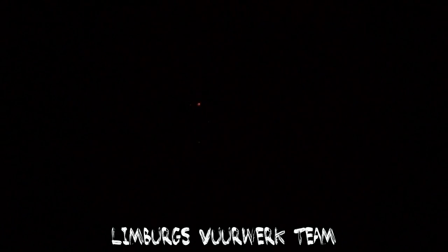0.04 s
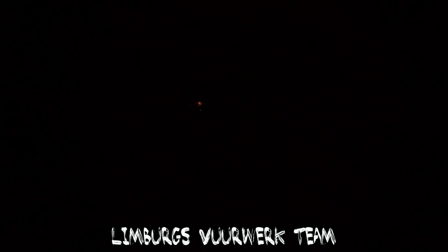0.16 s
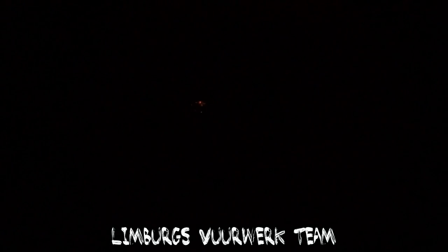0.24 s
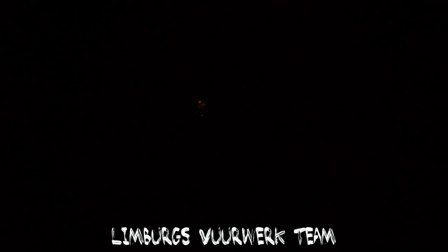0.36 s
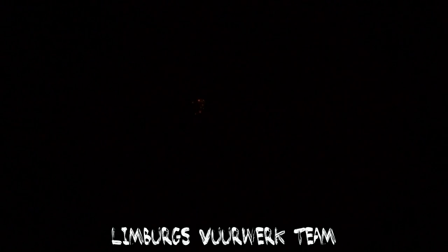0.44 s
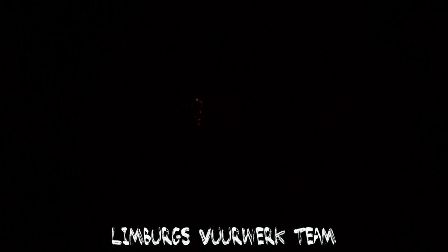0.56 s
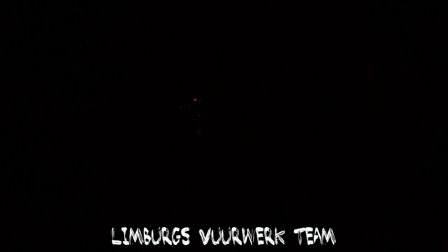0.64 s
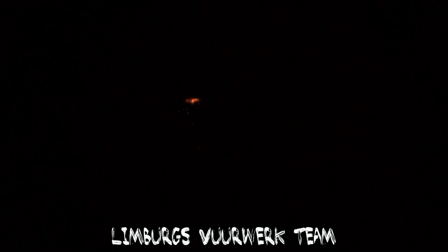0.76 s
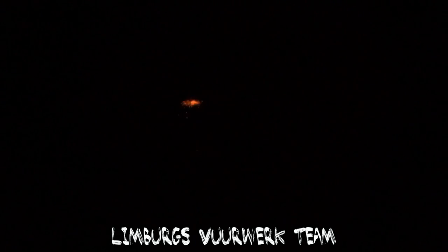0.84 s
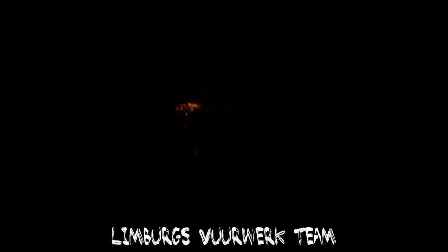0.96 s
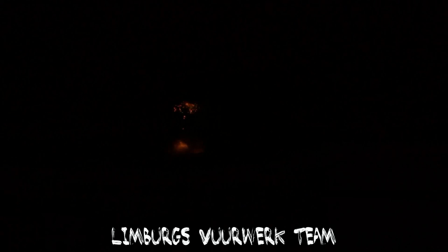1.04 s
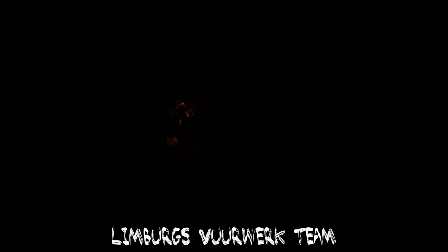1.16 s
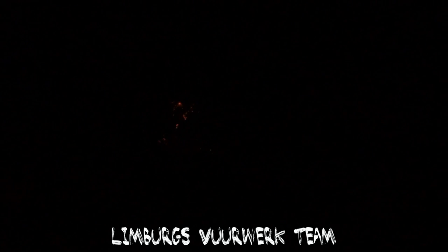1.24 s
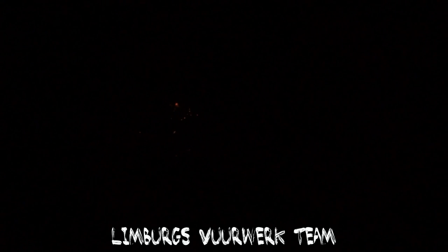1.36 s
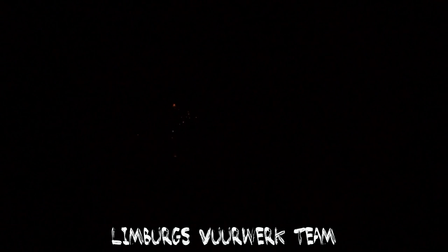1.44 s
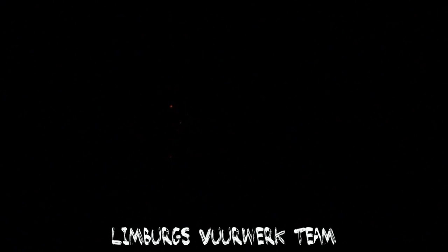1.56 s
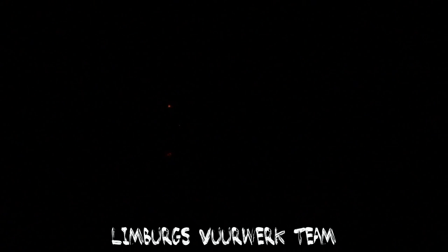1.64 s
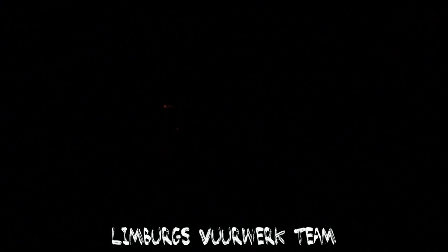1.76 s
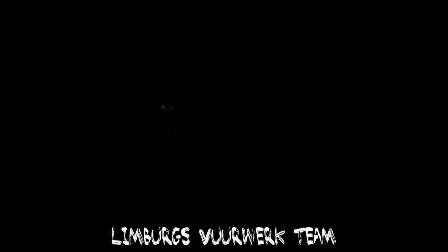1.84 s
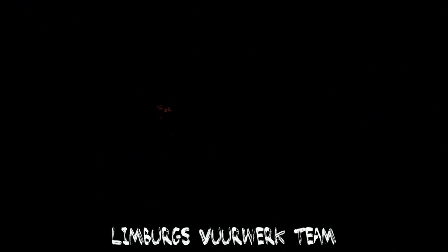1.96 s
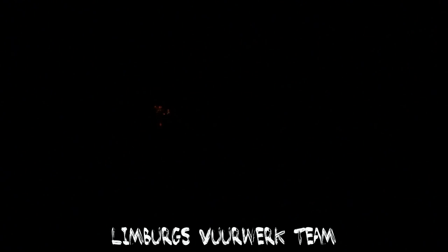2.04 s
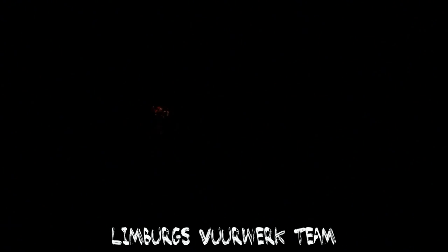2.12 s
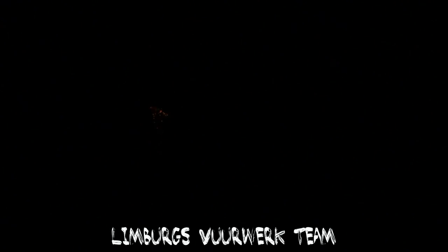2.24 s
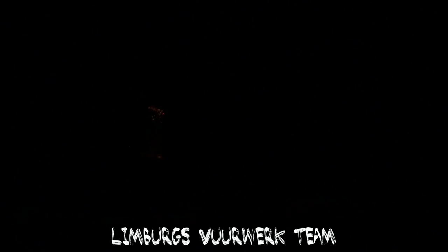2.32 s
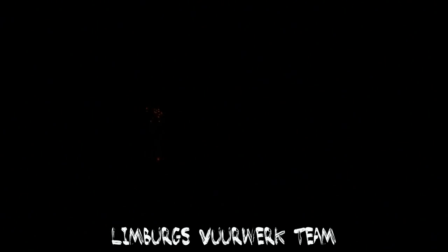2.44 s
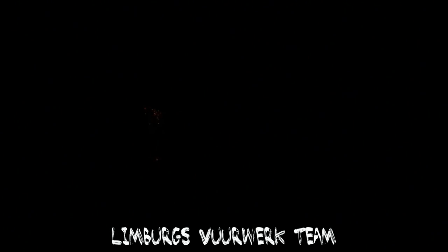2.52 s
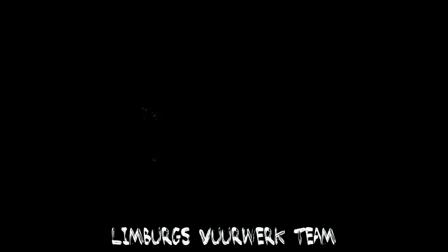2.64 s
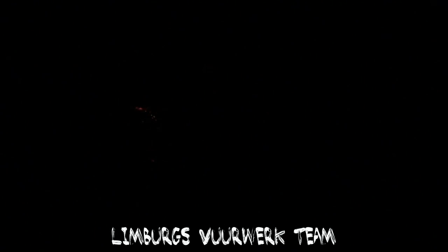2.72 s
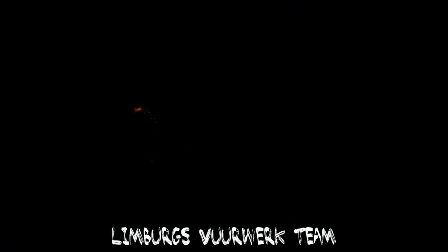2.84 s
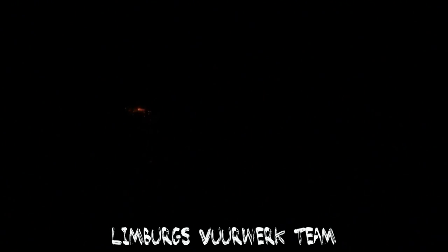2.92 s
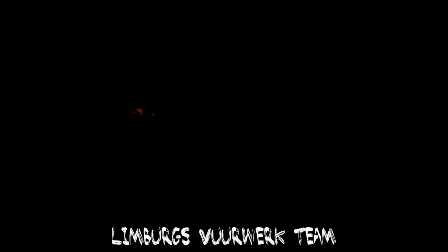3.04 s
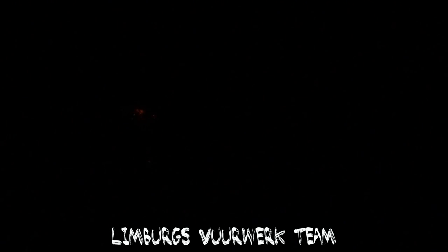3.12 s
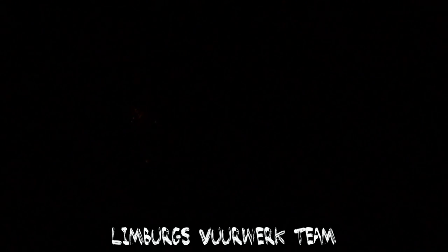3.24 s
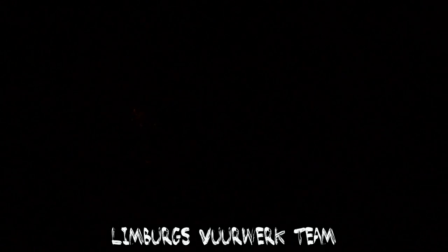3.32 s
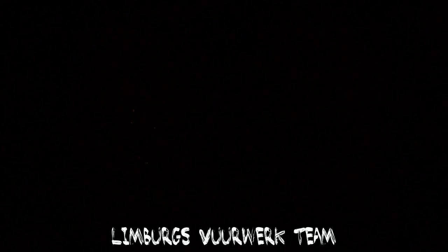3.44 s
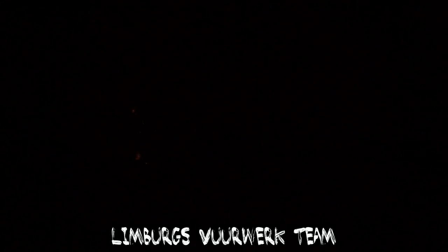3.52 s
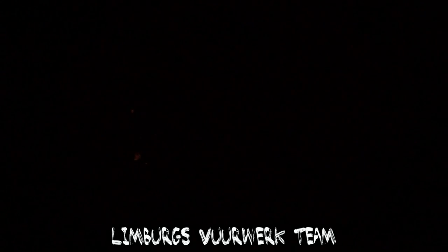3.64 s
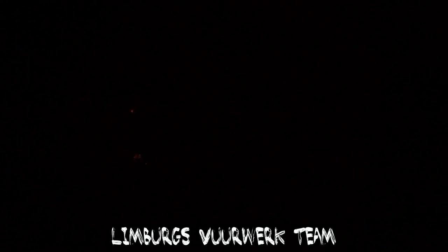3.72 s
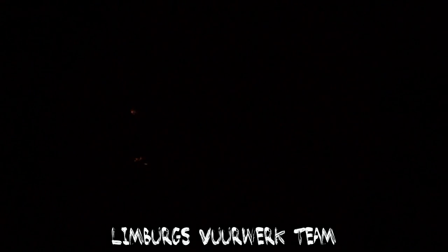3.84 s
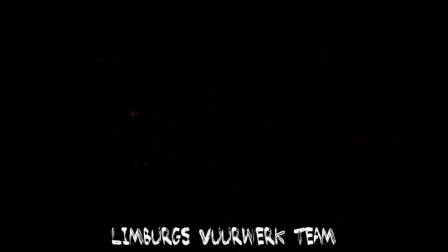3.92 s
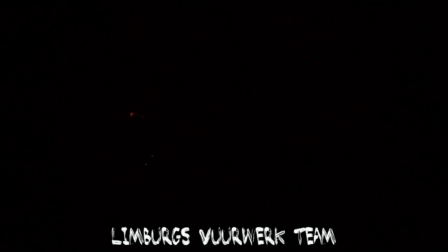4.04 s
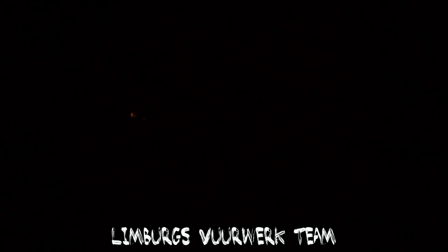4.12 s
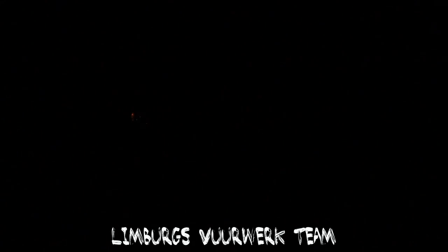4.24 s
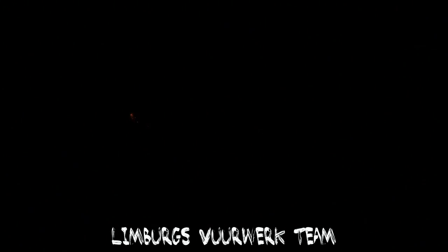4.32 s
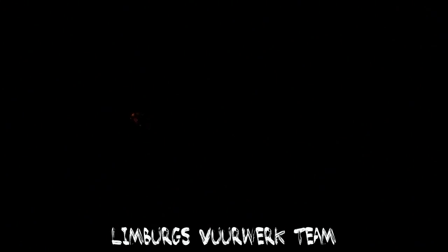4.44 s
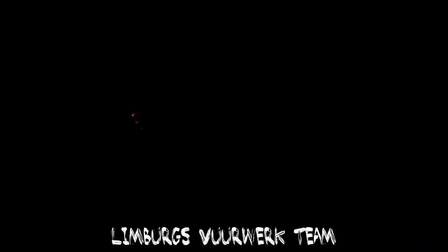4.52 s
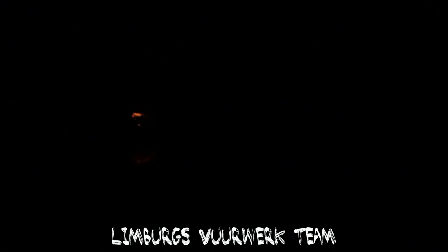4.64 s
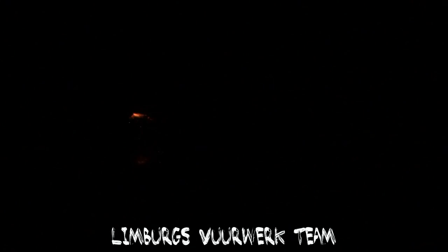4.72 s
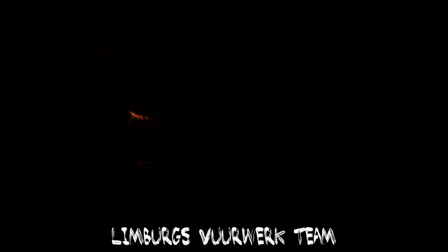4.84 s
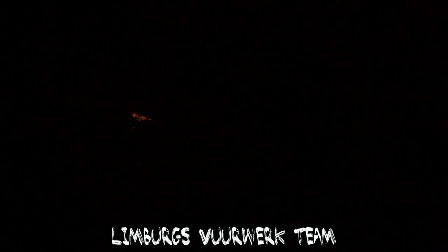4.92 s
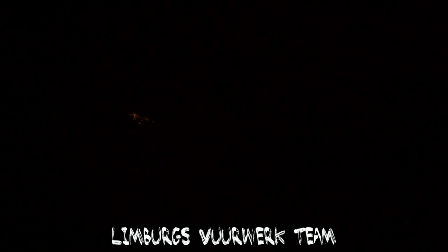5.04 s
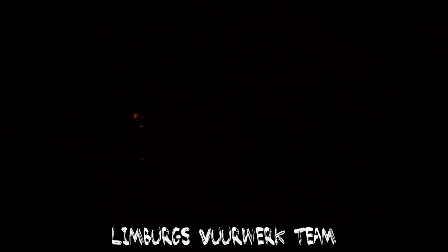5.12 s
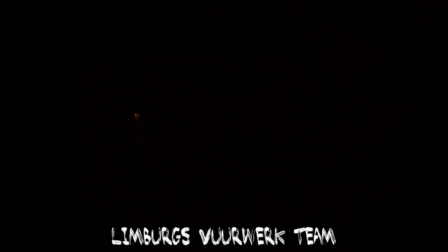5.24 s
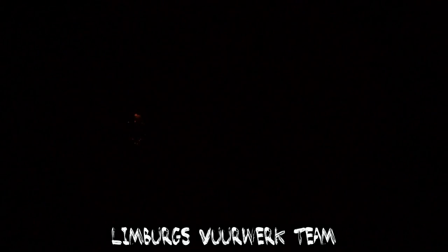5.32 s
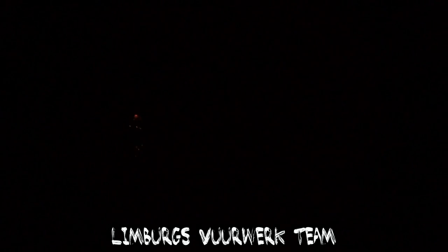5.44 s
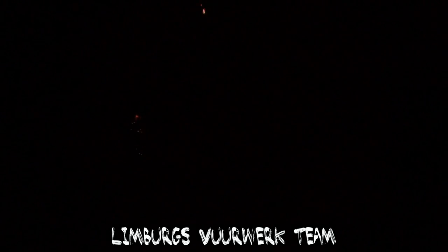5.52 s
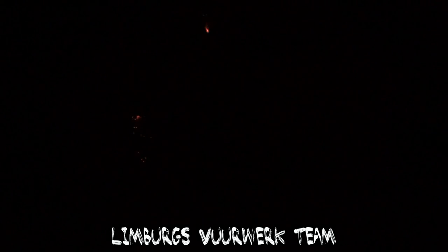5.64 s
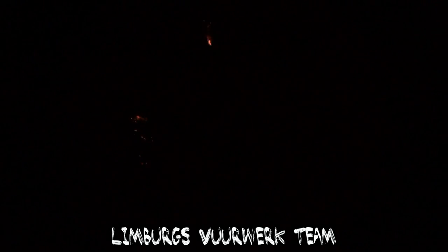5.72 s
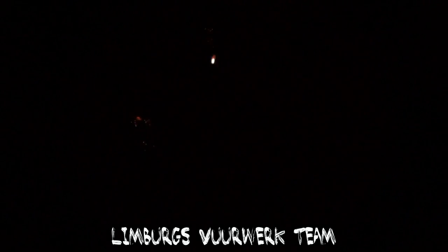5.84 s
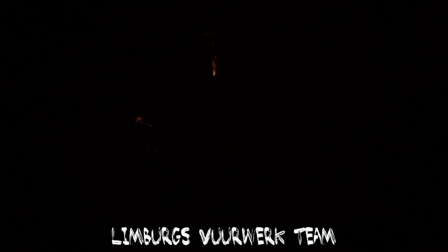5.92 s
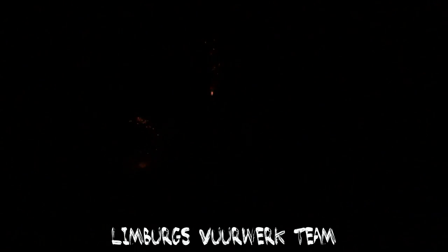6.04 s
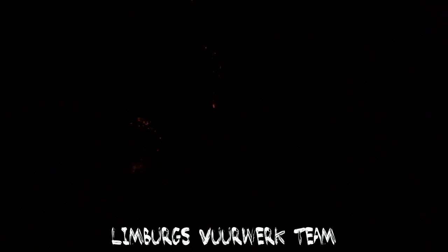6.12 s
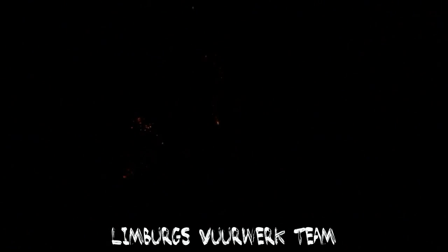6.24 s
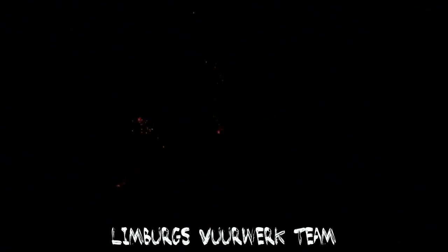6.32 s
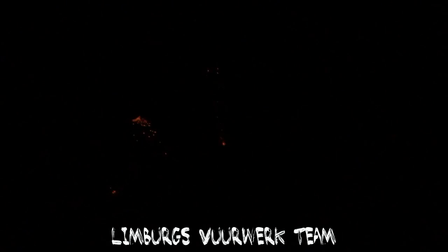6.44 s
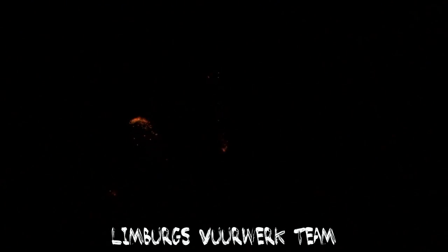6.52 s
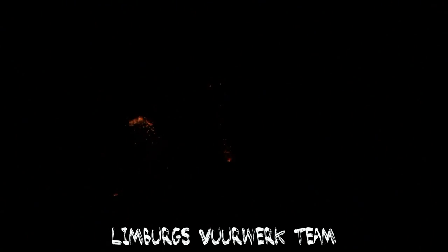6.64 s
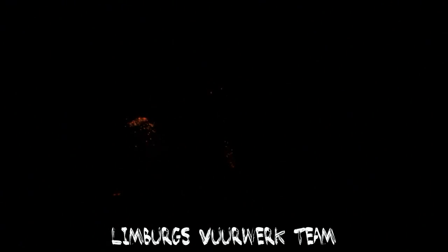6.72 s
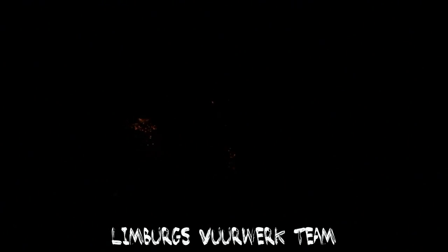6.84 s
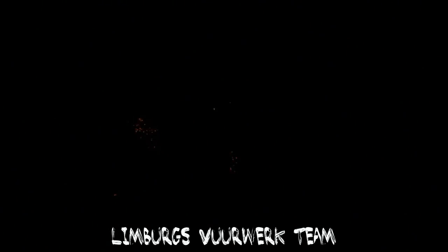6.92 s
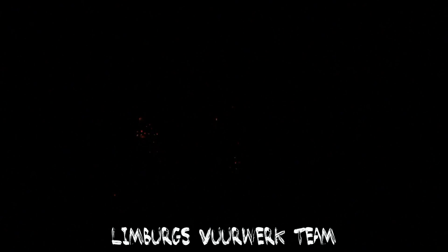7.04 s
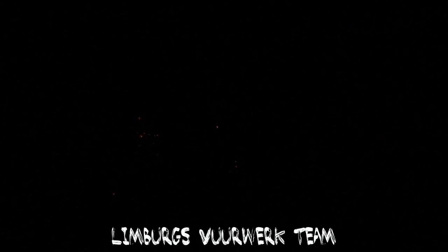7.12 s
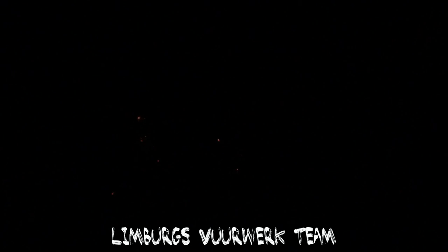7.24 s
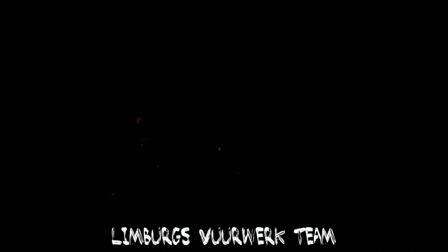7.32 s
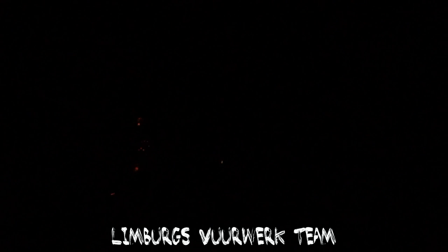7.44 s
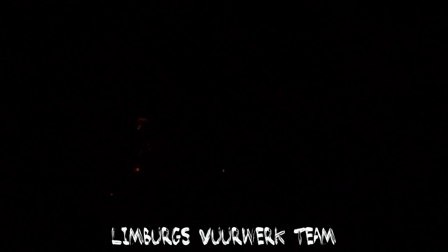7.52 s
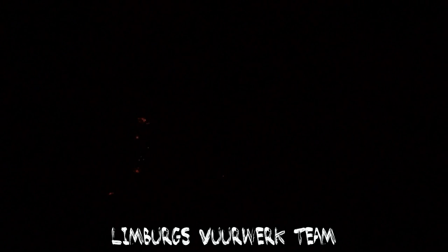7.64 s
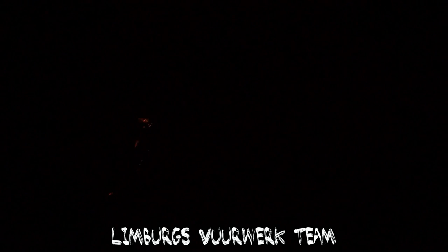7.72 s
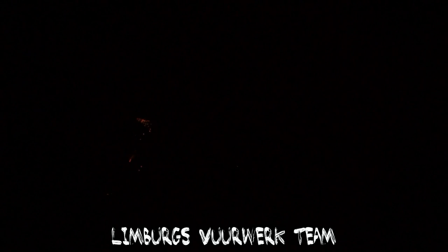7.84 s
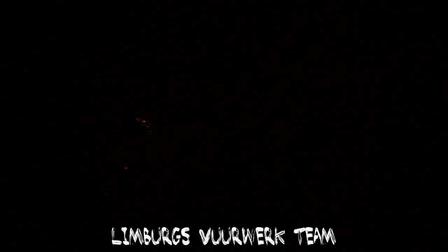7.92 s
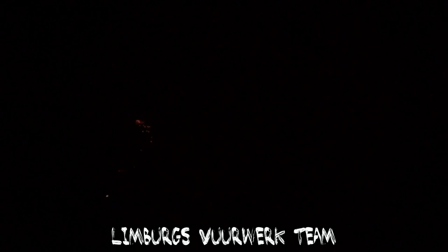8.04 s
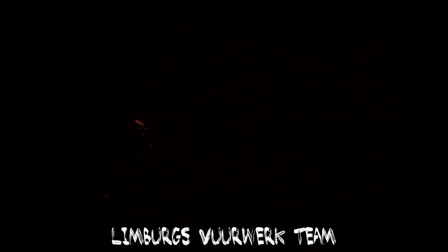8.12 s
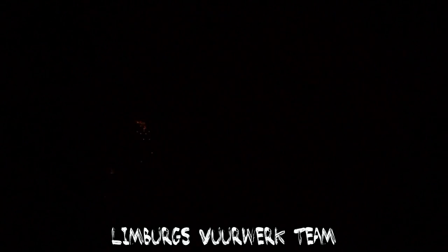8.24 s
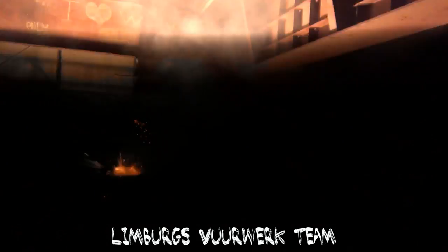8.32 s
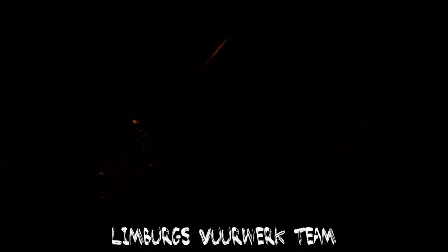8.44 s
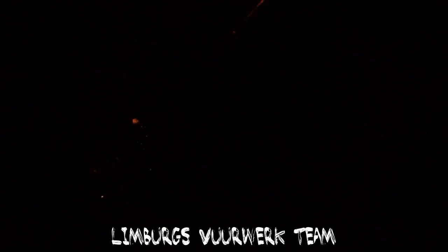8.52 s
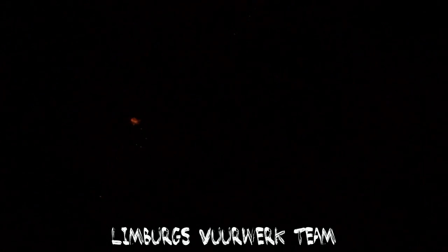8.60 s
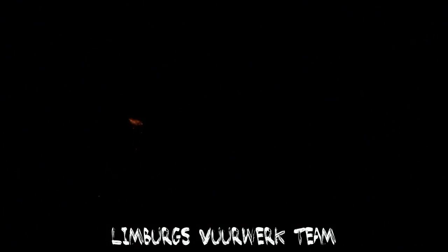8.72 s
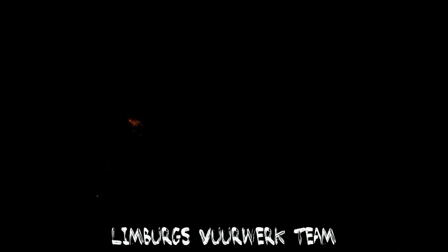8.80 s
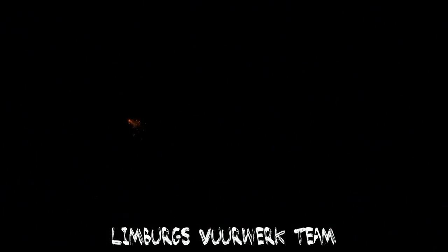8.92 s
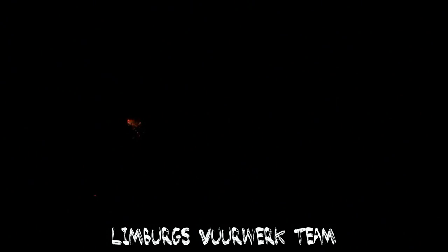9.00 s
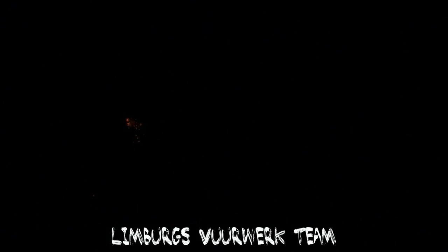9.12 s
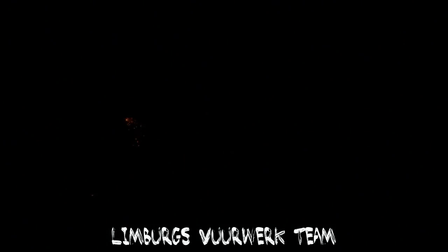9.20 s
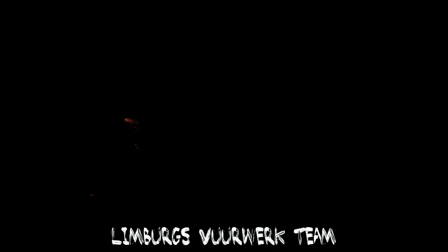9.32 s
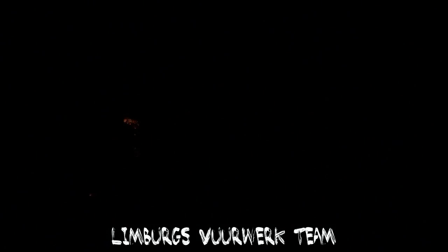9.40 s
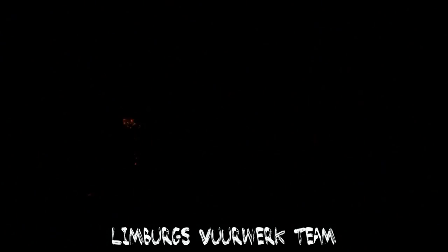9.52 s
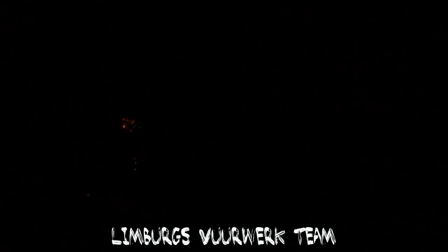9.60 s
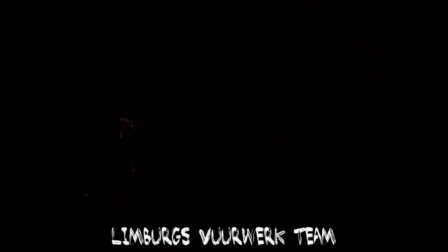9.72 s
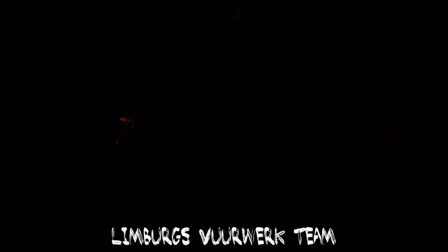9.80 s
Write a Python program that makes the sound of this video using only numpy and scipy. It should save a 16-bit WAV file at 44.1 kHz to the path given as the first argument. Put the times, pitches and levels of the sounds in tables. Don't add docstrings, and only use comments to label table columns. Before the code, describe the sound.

The fading roar of an earlier explosion opens the scene, then five heavy firecrackers go off singly at uneven gaps. Each blast hits instantly, overloads the microphone into dense distortion, and rolls away through a long hard-walled space with sharp slap echoes. In the quieter tails a fuse hisses faintly and embers tick over thin night-air noise.

```python
import sys
import numpy as np
from scipy import signal
from scipy.io import wavfile

SR = 44100
rng = np.random.default_rng(int(sys.argv[2]) if len(sys.argv) > 2 else 0)


def transcribe(u):
    v = np.clip(np.atleast_2d(u).T, -1, 1)
    q = np.round(v * 32767).astype(np.int16)
    wavfile.write(sys.argv[1], SR, q)


def amplitude_ratio(level_db):
    exponent = np.asarray(level_db, float) / 20
    return 10 ** exponent


N = 435266
FRAME, HOP = 512, 256
SNAP = 400


def read(points, hz):
    f, value = np.transpose(points)
    return np.interp(np.log(hz + 1), np.log(f + 1), value)


def sound_of(spectra):
    return signal.istft(spectra, window="cosine", nperseg=FRAME, noverlap=HOP)[1]


# f/Hz, likeness [0 to 1]
LIKENESS = [(30, .5), (70, .82), (240, .88), (600, .82), (3800, .93), (9000, .99)]
# f/Hz, level/dB
LEAN = [(60, 2.0), (380, 2.0), (2380, 1.0), (15000, 0.0)]


def pair(frames, hz):
    a, b, c, d = rng.standard_normal((frames, len(hz), 4)).T
    same = np.clip(read(LIKENESS, hz), -1, 1)[:, None]
    lean = amplitude_ratio(read(LEAN, hz) / 2)[:, None]
    left = a + 1j * b
    right = same * left + np.sqrt(1 - same ** 2) * (c + 1j * d)
    return np.array([left * lean, right / lean])


def hiss(colour, flicker_db):
    frames, hz = N // HOP + 2, np.fft.rfftfreq(FRAME, 1 / SR)
    level_db = read(colour, hz)[:, None] + flicker_db * rng.standard_normal(frames)
    noise = sound_of(pair(frames, hz) * amplitude_ratio(level_db))[:, :N]
    return noise / noise.std()


# f/Hz, level/dB
HUSH = [(1500, 3), (3500, 5), (6500, 0), (9500, 2), (11500, 0), (14000, -10), (16000, -16)]


def night_hush():
    return amplitude_ratio(-73.3) * hiss(HUSH, .6)


def sparks():
    per_s, level_db, spread_db = 6, -69, 1.2
    t = np.arange(SNAP) / SR
    ring = np.sin(2 * np.pi * 14200 * t) * np.exp(-t / .0002) * np.minimum(t / .00008, 1)
    chance, size = rng.random((N, 2)).T
    train = (chance < per_s / SR) * amplitude_ratio(level_db - spread_db * np.log(size + 1e-3))
    return signal.oaconvolve(train, ring)[:N]


# t/s, peak level/dB
TICKS = [(0.417, -67), (0.636, -67), (0.7094, -68), (0.8086, -62), (4.2722, -48), (4.2824, -60),
         (4.4653, -53), (5.471, -66), (5.491, -66), (5.734, -66), (5.754, -66), (5.844, -66), (5.8556, -59),
         (6.6623, -65), (6.7394, -67), (7.1746, -62), (7.3414, -71), (7.4594, -70), (7.5682, -61),
         (7.8082, -64), (7.8406, -62), (7.8984, -67), (7.9394, -61), (8.0217, -62), (8.0994, -69)]
# t/s, peak level/dB, ring f/Hz
LOW_TICKS = [(3.5433, -66, 9500), (4.2722, -55, 7200), (4.61, -62, 3300), (7.9718, -52, 5700),
             (8.2127, -61, 6000), (8.3953, -58, 4000)]


def embers():
    out, t = np.zeros((2, N)), np.arange(SNAP) / SR
    rows = [(s, db, 13500) for s, db in TICKS] + list(LOW_TICKS)
    for s, db, hz in rows:
        wisp = np.diff(rng.standard_normal(SNAP), prepend=0)
        ring = np.sin(2 * np.pi * hz * t) * np.exp(-t / .00014) * np.minimum(t / .00006, 1)
        snap = ring + .07 * wisp * np.exp(-t / .0015)
        at = round((s + .001) * SR)
        out[:, at:at + SNAP] += amplitude_ratio(db + 7.5) * snap
    return out


# f/Hz, level/dB
SIZZLE = [(2060, -40), (3500, -15), (5000, -14), (7000, -12), (8500, -3), (10500, 0), (12800, -5),
          (16000, -16)]
# t/s at full blaze, level/dB, hold/s
FLARES = [(.5, -78, .07), (.9, -68, .08), (2.2, -82, .17), (3.45, -82, .15), (3.87, -76, .17),
          (4.3, -76, .15), (4.58, -71, .1), (5.9, -78, .04), (7.42, -81, .17), (7.98, -79, .2),
          (8.33, -74, .09), (9.8, -84, .1)]


def fuse():
    rise_db_per_s, fade_db_per_s, smoulder_db = 45, 110, -88
    t = np.arange(N) / SR
    blaze_db = np.full(N, smoulder_db, float)
    for s, db, hold in FLARES:
        early, late = np.maximum(s - t, 0), np.maximum(t - s - hold, 0)
        blaze_db = np.maximum(blaze_db, db - rise_db_per_s * early - fade_db_per_s * late)
    sizzle = hiss(SIZZLE, 1.1) * amplitude_ratio(blaze_db)
    bounce = np.roll(sizzle, round(.0017 * SR), axis=1)
    return sizzle + .55 * bounce


# f/Hz, level/dB
BLAST = [(80, -10.5), (320, 1), (700, -7), (1500, -12), (3000, -18.2), (6000, -22.8), (10000, -22.5),
         (16000, -31)]
# f/Hz, decay rate/(dB per s)
LOSS = [(40, 13), (350, 21.5), (1600, 32), (3000, 39.2), (5500, 56), (9000, 83.5), (13000, 100),
        (16000, 116)]
# t/s after the bang, level/dB over the roar, centre f/Hz, width/octaves, fade/s
SLAPS = [
    (.03, 8, 70, .9, .06),
    (.07, 5, 4500, 1.5, .01),
    (.173, 6.5, 4500, 1.5, .011),
    (.666, 13, 10000, .28, .005),
    (.682, 14, 10000, .3, .007),
    (1.102, 14.5, 7500, .6, .006),
    (1.8, 19.5, 4500, .65, .011),
    (1.82, 2.5, 2400, 1.2, .5),
]


def passage_roars(count, seconds):
    frames, hz = seconds * SR // HOP, np.fft.rfftfreq(FRAME, 1 / SR)
    t, column = np.arange(frames) * HOP / SR, hz[:, None] + 1
    age = t / (1 + (.11 + .09 * np.minimum(column / 4000, 1)) * t)
    clumps_db = 3.2 * rng.standard_normal(frames) * np.exp(-t / .5)
    swell_db = -4.8 * np.exp(-t / .18) / (1 + (column / 600) ** 2)
    lift = np.ones((len(hz), frames))
    for s, db, centre_hz, octaves, fade in SLAPS:
        burst = np.exp(-np.maximum(t - s, 0) / fade) * (t >= s)
        lift += amplitude_ratio(2 * db) * burst * np.exp(-(np.log2(column / centre_hz) / octaves) ** 2)
    colour = amplitude_ratio(read(BLAST, hz))[:, None]
    loss_db = read(LOSS, hz)[:, None] * age
    decay = amplitude_ratio(clumps_db * np.minimum(column / 1500, 1) + swell_db - loss_db)
    size = colour * decay * np.sqrt(lift / np.mean(colour ** 2) / FRAME)
    alike = .75
    walls = pair(frames, hz)
    spectra = [alike * walls + np.sqrt(1 - alike ** 2) * pair(frames, hz) for _ in range(count)]
    return sound_of(np.array(spectra) * size)


# t/s, overload ceiling level/dB, blast level/dB over the ceiling, gain creep/(dB per s)
BANGS = [
    (-.62, -17.5, 4.5, 6),
    (1.1105, -15.2, 11, 0),
    (2.393, -16.2, 11, 0),
    (4.6812, -17.2, 11, 0),
    (6.0965, -18, 10.5, 0),
    (8.4238, -18.5, 11, 1),
]


def bangs():
    lead, roar_s = 1, 3
    out = np.zeros((2, N + (lead + roar_s) * SR))
    for (s, ceiling_db, over_db, creep_db), roar in zip(BANGS, passage_roars(len(BANGS), roar_s)):
        t = np.arange(roar.shape[1]) / SR
        at = round((s + lead) * SR)
        fill = 1 - .7 * np.exp(-t / .004)
        out[:, at:at + len(t)] += amplitude_ratio(ceiling_db + over_db + creep_db * t) * roar * fill
    return out[:, lead * SR:][:, :N]


def scene():
    return night_hush() + sparks() + embers() + fuse() + bangs()


def squash(x, ceiling, knee):
    return x / (1 + abs(x / ceiling) ** knee) ** (1 / knee)


def top_cut(x):
    return signal.sosfilt(signal.butter(12, 16790, fs=SR, output="sos"), x)


def record(dry):
    s, ceiling_db, *_ = np.transpose(BANGS)
    t = np.arange(N) / SR
    right_db = -1.3
    ceiling = amplitude_ratio(ceiling_db[np.searchsorted(s, t) - 1] + [[0], [right_db]])
    faded_in = dry * np.minimum(t / .0015, 1)
    capsule = signal.lfilter(*signal.butter(2, 142, "high", fs=SR), faded_in)
    squashed = squash(capsule, ceiling, 2.6)
    cut = signal.lfilter(*signal.butter(1, 235, "high", fs=SR), squashed)
    pole = np.exp(-2 * np.pi * 320 / SR)
    turned = signal.lfilter([pole, -1], [1, -pole], cut)
    limited = squash(turned, 1.9 * ceiling, 4.0)
    edge = signal.firwin(601, 15780, window=("kaiser", 6), fs=SR)
    finished = signal.oaconvolve(limited, edge[None], "same", axes=1)
    return top_cut(finished)


dry = scene()
out = record(dry)
transcribe(out)
```